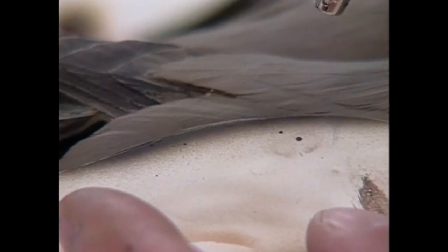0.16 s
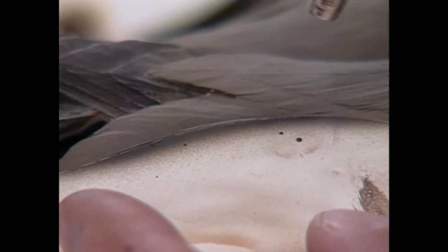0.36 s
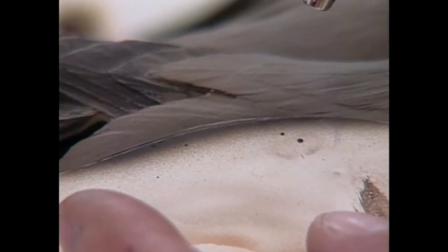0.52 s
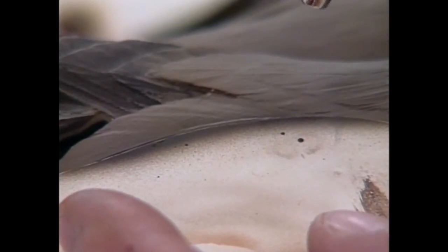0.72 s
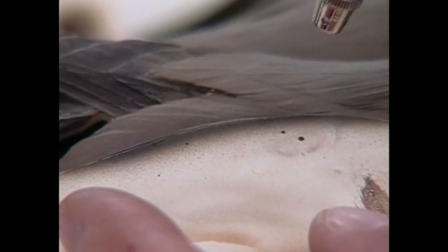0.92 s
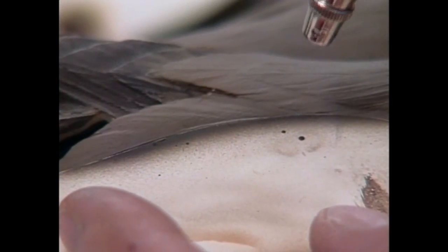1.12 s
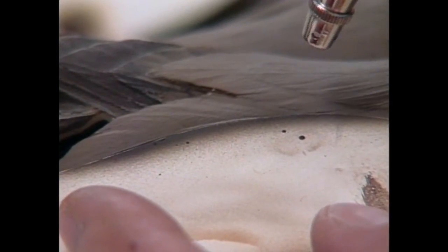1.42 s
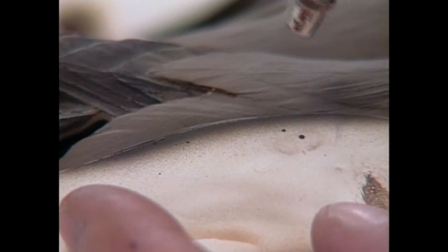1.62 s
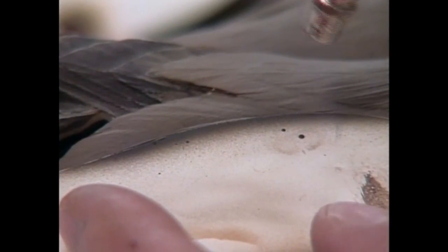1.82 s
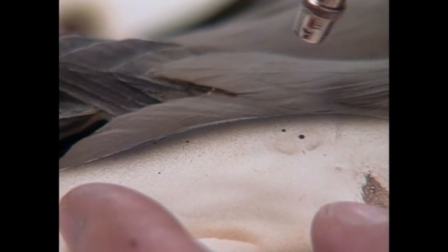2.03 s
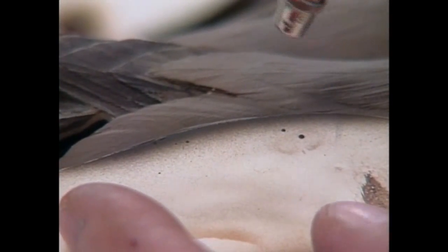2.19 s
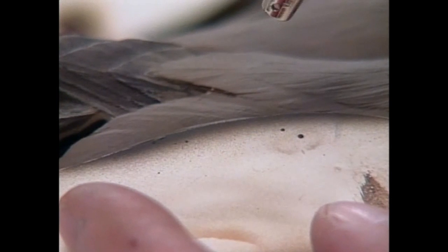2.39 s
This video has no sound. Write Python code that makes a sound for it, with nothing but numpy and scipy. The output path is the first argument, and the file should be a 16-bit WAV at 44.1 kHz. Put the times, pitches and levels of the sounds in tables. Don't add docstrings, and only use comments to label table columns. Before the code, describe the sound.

Short bursts of pressurised air and paint spray from an airbrush, close up, over faint room hum

```python
import sys
import numpy as np
from scipy import signal
from scipy.fft import rfft, irfft, next_fast_len
from scipy.io import wavfile
from scipy.ndimage import uniform_filter1d, map_coordinates

SR = 44100
rng = np.random.default_rng(int(sys.argv[2]) if len(sys.argv) > 2 else 0)


def amplitude_ratio(level_db):
    exponent = np.asarray(level_db, float) / 20
    return 10 ** exponent


def wrap_up_sound(samples):
    columns = np.atleast_2d(samples).T
    tamed = np.clip(columns, -1, 1)
    steps = np.round(tamed * 32767).astype(np.int16)
    wavfile.write(sys.argv[1], SR, steps)


N = 112454

# (frequency [Hz], level [dB], unsteadiness [dB])
HUM_LINES = [(60.7, -67.5, 2), (101.7, -69.5, 4), (121.7, -73.5, 4), (176.3, -74.5, 5.5), (236.6, -76, 4.5),
             (459, -87, 7.5)]
# (frequency [Hz], density [dB per Hz])
RUMBLE_COLOUR = [(12, -56), (20, -19.5), (43, -2), (107, -12.5), (145, -11), (236, -12), (266, -23.5),
                 (462, -21), (700, -38), (910, -73), (1540, -120)]
# (frequency [Hz], density [dB per Hz])
HISS_COLOUR = [(350, -27), (600, -12), (1620, -13.5), (2060, -15.5), (2940, -22), (13600, -19),
               (15400, -13.5)]
# (frequency [Hz], left-right correlation [0-1])
QUIET_LIKENESS = [(60, 0.83), (240, 0.9), (950, 0.71), (3770, 0.75), (15000, 0.98)]
# (time [s], jet level [dB], paint body over the jet [dB])
TRIGGER_PRESSES = [
    [(.178, -77, 0.5), (.19, -52.5, -12), (.215, -49, -6), (.222, -29.5, -21), (.30, -31.5, -19.5),
     (.39, -32.5, -15), (.45, -34.5, -11.5), (.615, -38.5, -6.5), (.626, -53, -2)],
    [(.775, -79.5, -6), (.79, -69.5, -6), (.832, -61, 0.5), (.845, -35.5, -10.5), (.91, -36.5, -7.5),
     (1.05, -37.5, -7.5), (1.16, -36, -10), (1.208, -38.5, -7.5), (1.222, -56, -3)],
    [(1.61, -82.5, -5), (1.663, -51.5, -6.5), (1.667, -35.5, -15), (1.77, -32.5, -16.5),
     (1.83, -35.5, -9.5), (2.19, -41, -6.5), (2.27, -47.5, -3.5), (2.353, -62, 3.5), (2.362, -68.5, 5.5)],
    [(2.485, -84.5, -3), (2.525, -70.5, -5), (2.529, -61, -3), (2.56, -54, 0.5)],
]
# (frequency [Hz], density [dB per Hz])
SEEP_COLOUR = [(400, -15), (1000, -14), (1500, -7), (3000, -9.5), (7000, -2.5), (10000, 3), (13000, -0.5),
               (16500, -1.5)]
# (frequency [Hz], density [dB per Hz])
JET_COLOUR = [(2500, -59), (5000, -18), (7000, -9), (8500, -4), (10000, -3.5), (12500, -5.5), (14500, -6),
              (16500, -17)]
# (frequency [Hz], density [dB per Hz])
PAINT_COLOUR = [(250, -21.5), (450, -10.5), (900, -13), (1250, 0.5), (1700, -1.5), (3000, -6.5), (5500, -5),
                (16500, -13)]
# (frequency [Hz], width [Hz], lift [dB])
CAP_RESONANCES = [(1576, 274, 6), (2555, 296, 7.5), (3668, 360, 9.5), (4324, 360, 7), (5723, 340, 9),
                  (6380, 370, 2.5), (7690, 210, 5.5), (8790, 77, 7.5), (8700, 40, 5.5), (9740, 830, 7.5),
                  (10300, 220, 7), (11990, 330, 11), (12730, 580, 7), (14100, 400, 3)]
# (frequency [Hz], left-right correlation [0-1])
SPRAY_LIKENESS = [(1000, 0.99), (3000, .99), (5000, 0.93), (8000, 0.83), (12000, 0.76), (16000, .7)]
# (frequency [Hz], left over right [dB])
SPRAY_LEAN = [(3000, -0.5), (5000, 2.8), (8000, 1.2), (15000, 2)]
# (frequency [Hz], decay by 60 dB [s])
ROOM_DECAY = [(500, 0.25), (2000, 0.35), (5000, 0.37), (10000, 0.26), (16000, 0.12)]
# (frequency [Hz], threshold [dB])
SUM_THRESHOLD = [(230, -56.5), (300, -43.5), (600, -40), (900, -34), (1100, -44), (3000, -43), (5200, -46),
                 (7000, -58.5)]
# (frequency [Hz], threshold [dB])
DIFFERENCE_THRESHOLD = [(100, -35), (1000, -34.5), (4000, -37), (6500, -37.5), (7200, -52.5),
                        (14500, -52.5), (15300, -41.5), (16000, -36)]
# (time [s], extra threshold [dB])
THRESHOLD_DRIFT = [(.1, -0.5), (.22, -3.5), (.26, 0.7), (.32, -1), (.37, -6), (.55, 0), (.8, -5.5),
                   (1.0, -3.5), (1.12, 3), (1.19, 2), (1.3, -6), (1.65, -5), (1.76, -3), (1.93, -4),
                   (2.07, 3.5), (2.19, 3), (2.28, -4.5)]

RUMBLE_DB, HISS_DB = -66.5, -74.5
WHISTLE_HZ, WHISTLE_DB, WHISTLE_SWAY_DB = 15734, -80.5, 3
FLUTTER_DB, SPIT_DB = 0.9, -0.02
SEEP_BELOW_DB, SEEP_FADE_DB, SEEP_DB = -52, 10.5, 1
PAINT_DB, BUFFET_DB = 5.5, -29.5
LEAD_S = .000009
ROOM_DB, ROOM_GAP_S = -11, .004
TOP_HZ = 15780
PIVOT_DB, SWAY_DB = -35.5, 3.5
EDGE_LIFT_DB, PEAKY = 0.5, 0.64


def unit(x):
    return x / np.sqrt(np.mean(x ** 2) + 1e-20)


def along(points, hz):
    f, v = np.transpose(points)
    return np.interp(np.log(hz + 1), np.log(f + 1), v)


def wobble(rate):
    knots = rng.standard_normal(int(N * rate / SR) + 4)
    return map_coordinates(knots, [np.arange(N) * rate / SR])


def filtered(x, response):
    m = next_fast_len(N + SR // 2)
    return irfft(rfft(x, m) * response(np.fft.rfftfreq(m, 1 / SR)), m)[..., :N]


def rush(colour_db, alike, patchy_db):
    z = signal.stft(rng.standard_normal((2, N)), nperseg=512)[2]
    patches = uniform_filter1d(rng.standard_normal(z.shape[1:]), size=5, axis=0)
    patches = unit(uniform_filter1d(patches, size=8, axis=1))
    pair = signal.istft(z * amplitude_ratio(patchy_db * patches), nperseg=512)[1][:, :N]

    def mid_side(hz):
        turn = np.arccos(np.clip(along(alike, hz), -1, 1)) / 2
        return amplitude_ratio(colour_db(hz)) * np.array([np.cos(turn), np.sin(turn)])

    mid, side = filtered(pair, mid_side)
    return unit(np.array([mid + side, mid - side]))


def tone(hz, db, sway_db):
    t = np.arange(N) / SR
    level = amplitude_ratio(db + sway_db * (wobble(9) + 0.55 * wobble(24.95)))
    return np.sqrt(2) * level * np.sin(2 * np.pi * hz * t + 1.77 * wobble(3))


def machine_hum():
    return sum(tone(*line) for line in HUM_LINES)


def screen_whistle():
    return tone(WHISTLE_HZ, WHISTLE_DB, WHISTLE_SWAY_DB)


def rumble():
    return amplitude_ratio(RUMBLE_DB) * rush(lambda hz: along(RUMBLE_COLOUR, hz), QUIET_LIKENESS, patchy_db=2.0)


def microphone_hiss():
    return amplitude_ratio(HISS_DB) * rush(lambda hz: along(HISS_COLOUR, hz), QUIET_LIKENESS, patchy_db=-3.1)


def workshop():
    return machine_hum() + screen_whistle() + rumble() + microphone_hiss()


def cap_db(hz):
    return sum(db / (1 + (2 * (hz - c) / w) ** 2) for c, w, db in CAP_RESONANCES)


def valve_seep():
    colour = lambda hz: along(SEEP_COLOUR, hz) + .3 * cap_db(hz)
    return amplitude_ratio(SEEP_DB) * rush(colour, SPRAY_LIKENESS, patchy_db=2.1)


def air_jet():
    return rush(lambda hz: along(JET_COLOUR, hz) + cap_db(hz), SPRAY_LIKENESS, patchy_db=2.3)


def paint_body():
    return rush(lambda hz: along(PAINT_COLOUR, hz) + cap_db(hz), SPRAY_LIKENESS, patchy_db=0.54)


def bench_buffet():
    return amplitude_ratio(BUFFET_DB) * rush(lambda hz: along(RUMBLE_COLOUR, hz), QUIET_LIKENESS, patchy_db=0.0)


def airbrush():
    t = np.arange(N) / SR
    jet_gain, paint_gain = np.zeros(N), np.zeros(N)
    for press in TRIGGER_PRESSES:
        s, jet_db, paint_db = np.transpose(press)
        jet_gain += amplitude_ratio(np.interp(t, s, jet_db, -120, -120))
        paint_gain += amplitude_ratio(np.interp(t, s, jet_db + paint_db, -120, -120))
    formed = np.clip((20 * np.log10(jet_gain) - SEEP_BELOW_DB) / SEEP_FADE_DB, 0, 1) * np.pi / 2
    flow = amplitude_ratio(FLUTTER_DB * wobble(14) + SPIT_DB * wobble(120))
    jet, paint, seep, buffet = air_jet(), paint_body(), valve_seep(), bench_buffet()
    air = np.sin(formed) * jet + np.cos(formed) * seep
    spray = flow * (jet_gain * air + amplitude_ratio(PAINT_DB) * paint_gain * (paint + buffet))
    side = np.array([[.5], [-.5]])
    return filtered(spray, lambda hz: amplitude_ratio(side * along(SPRAY_LEAN, hz))
                    * np.exp(2j * np.pi * hz * side * LEAD_S))


def room(x):
    hz, t, z = signal.stft(rng.standard_normal((2, SR // 2)), SR, nperseg=256)
    turn = np.arccos(np.clip(along(QUIET_LIKENESS, hz), -1, 1))[:, None] / 2
    z = np.cos(turn) * z[0] + np.sin(turn) * z[1] * [[[1]], [[-1]]]
    z = z * amplitude_ratio(-60 * t / along(ROOM_DECAY, hz)[:, None])
    tail = signal.istft(z, SR, nperseg=256)[1]
    late = np.pad(x.mean(axis=0), (round(ROOM_GAP_S * SR), 0))
    return signal.fftconvolve(late[None], tail / np.linalg.norm(tail[0]), axes=1)[:, :N]


def scene():
    spray = airbrush()
    to_walls = filtered(spray, lambda hz: amplitude_ratio(-.8 * cap_db(hz)))
    return spray + amplitude_ratio(ROOM_DB) * room(to_walls) + workshop()


def thinned(x):
    lead = 264
    pair = np.pad([x[0] + x[1], x[0] - x[1]], [(0, 0), (lead, 0)]) / 2
    hz, t, z = signal.stft(pair, SR, nperseg=2048, noverlap=1536)
    band = np.where(hz < 900, hz / 86, 900 / 86 + 20 * np.log(hz / 900 + 1e-9)).astype(int)
    member = band == np.arange(band.max() + 1)[:, None]
    power = uniform_filter1d(member @ abs(z) ** 2, size=5, axis=2) / member.sum(axis=1)[:, None]
    band_db = 10 * np.log10(power + 1e-20)
    treble = z[0, (hz > 3000) & (hz < 15000)]
    loud_db = 10 * np.log10(np.sum(abs(treble) ** 2, axis=0) + 1e-12)
    chance = unit(uniform_filter1d(rng.standard_normal(band_db.shape), size=12, axis=2))
    shape_db = np.array([along(SUM_THRESHOLD, hz), along(DIFFERENCE_THRESHOLD, hz)])[..., None]
    follow_db = np.reshape([1.25, 1], (2, 1, 1)) * (loud_db - PIVOT_DB)
    follow_db = follow_db + np.interp(t - lead / SR, *np.transpose(THRESHOLD_DRIFT))
    over_db = (band_db - SWAY_DB * chance)[:, band] - (PIVOT_DB + follow_db + shape_db)
    edge = np.exp(-np.maximum(over_db, 0) / 6.25)
    peaks = np.clip(abs(z) / amplitude_ratio(band_db[:, band]), 1e-9, 2) ** (PEAKY * edge)
    gain = np.clip(over_db, 0, 1) * amplitude_ratio(EDGE_LIFT_DB * edge) * peaks
    mid, side = signal.istft(z * gain, SR, nperseg=2048, noverlap=1536)[1][:, lead:lead + N]
    return np.array([mid + side, mid - side])


def top_cut(x):
    return signal.sosfilt(signal.butter(12, 16430, fs=SR, output="sos"), x)


def record(dry):
    limited = filtered(dry, lambda hz: hz < TOP_HZ)
    mix = thinned(limited)
    return top_cut(mix)


dry = scene()
out = record(dry)
wrap_up_sound(out)
```